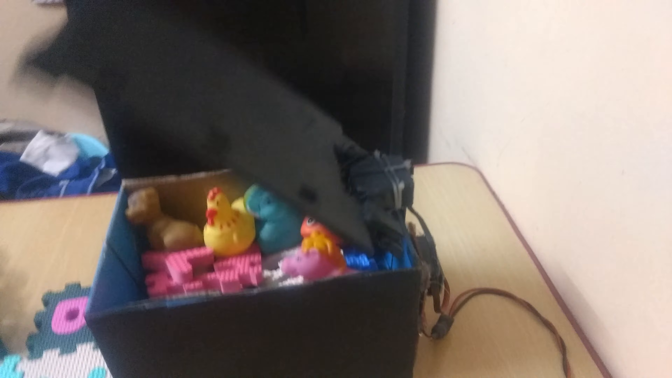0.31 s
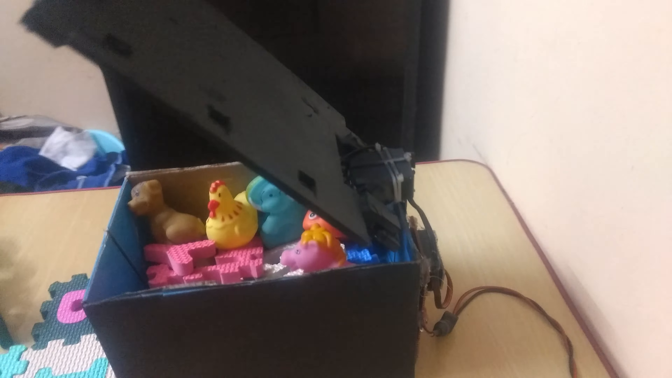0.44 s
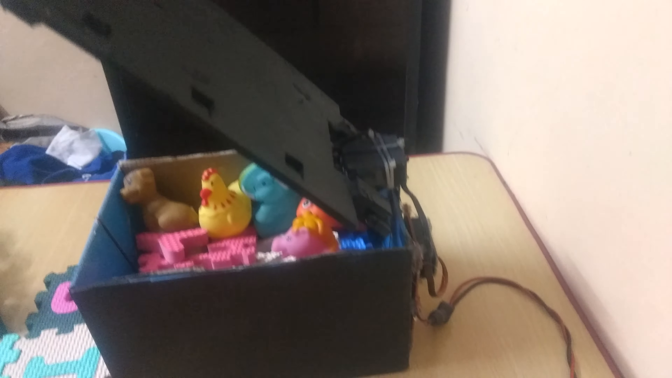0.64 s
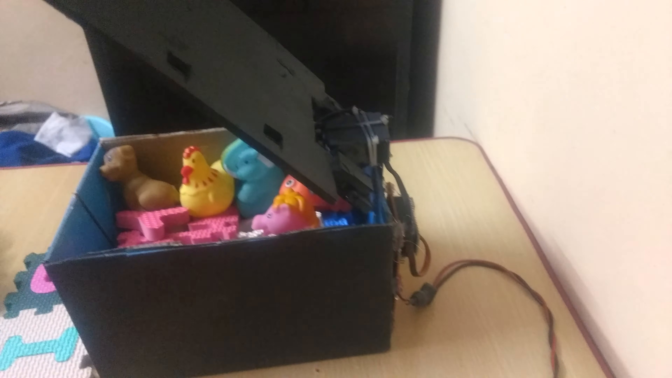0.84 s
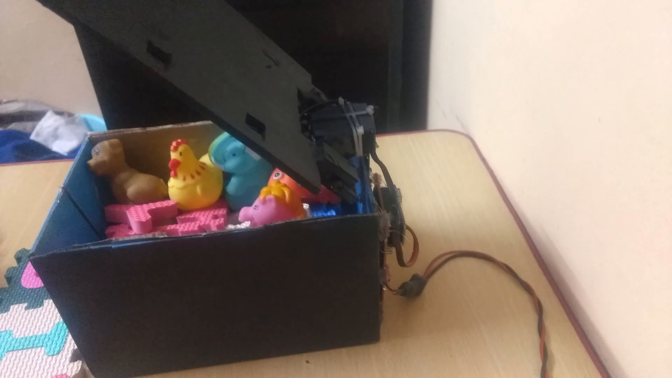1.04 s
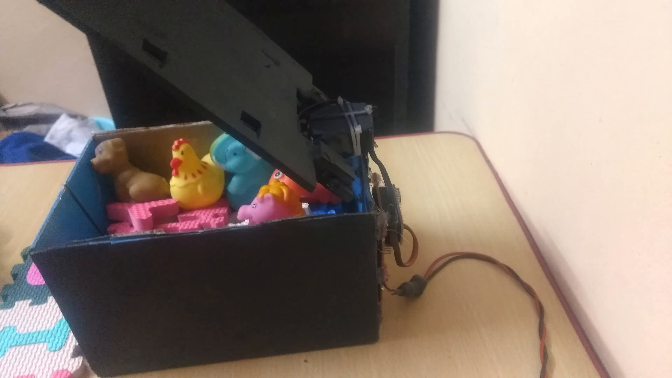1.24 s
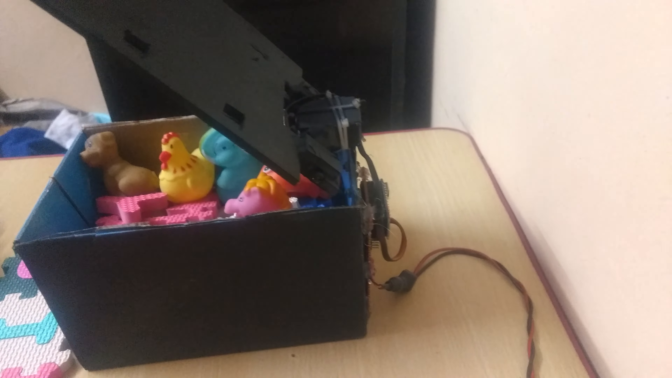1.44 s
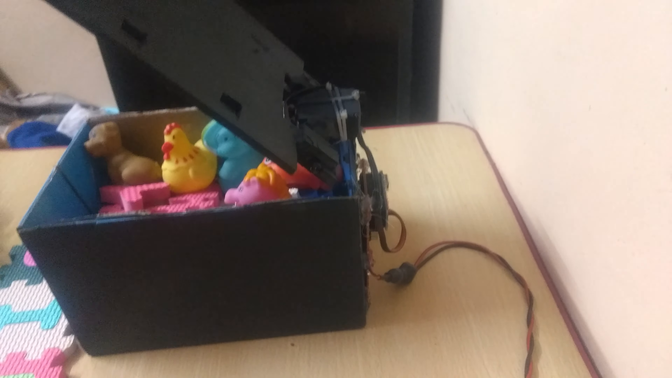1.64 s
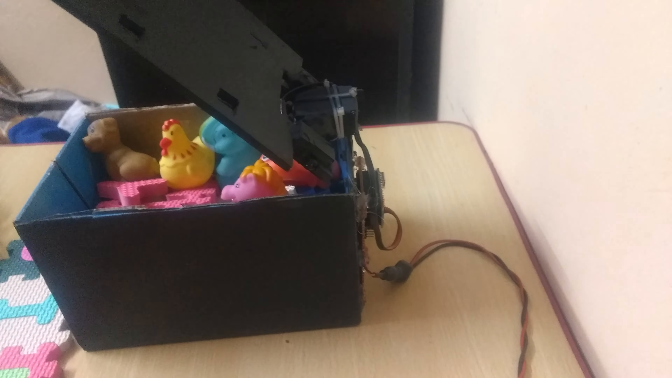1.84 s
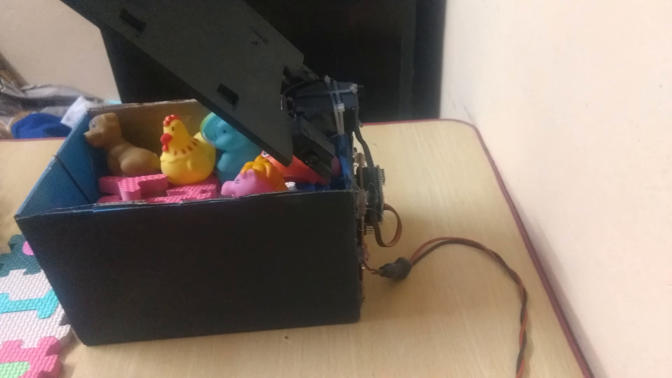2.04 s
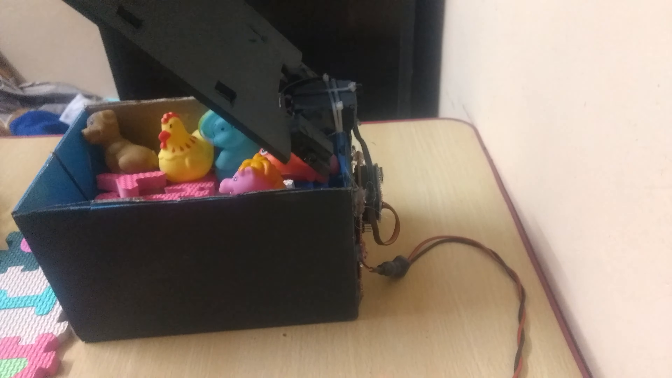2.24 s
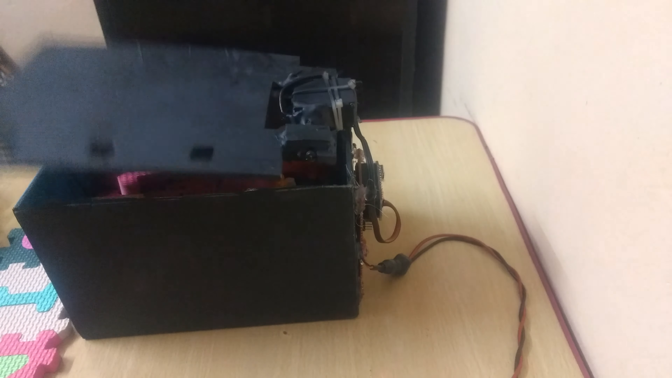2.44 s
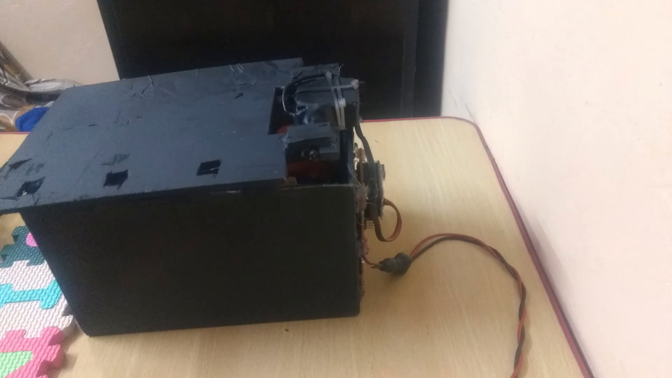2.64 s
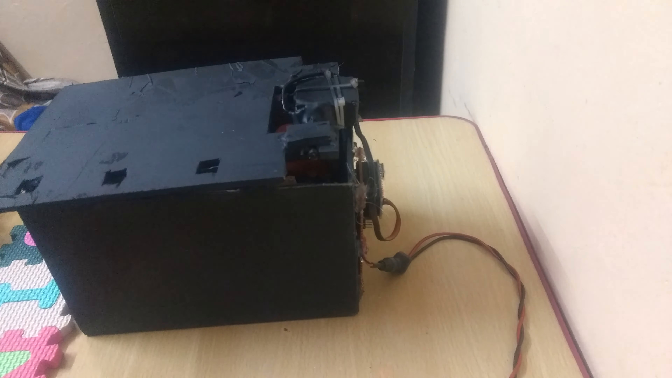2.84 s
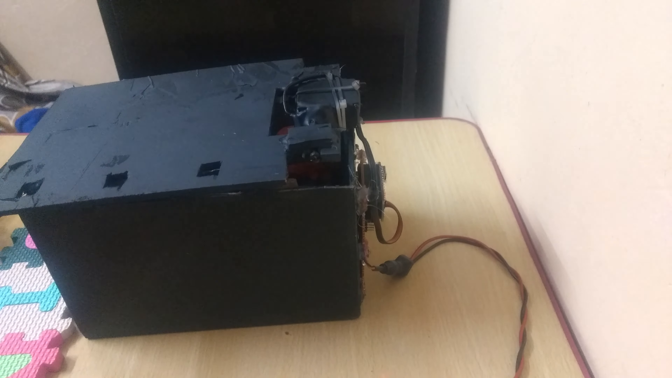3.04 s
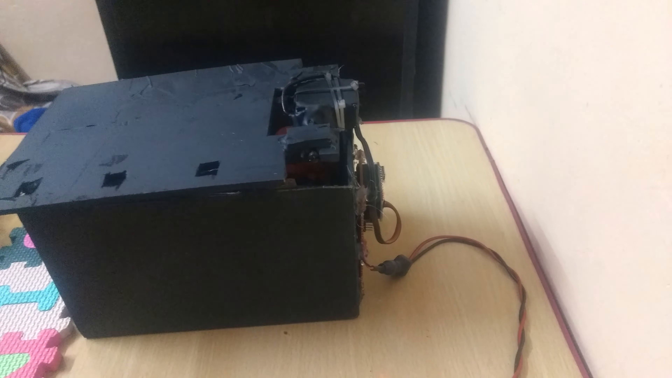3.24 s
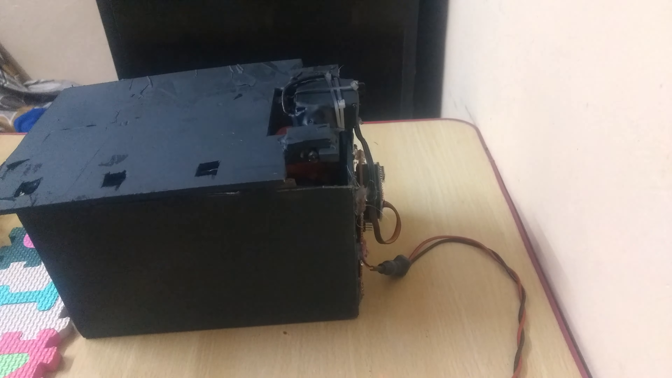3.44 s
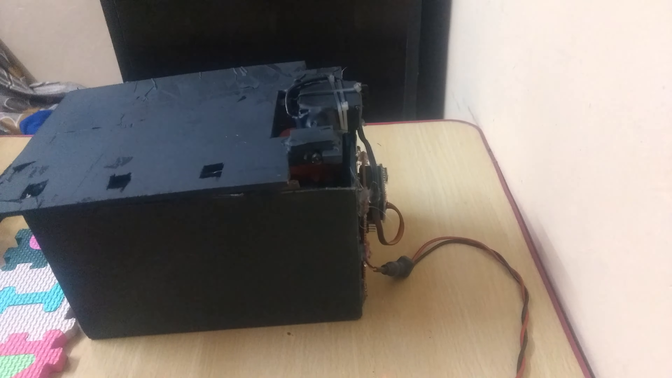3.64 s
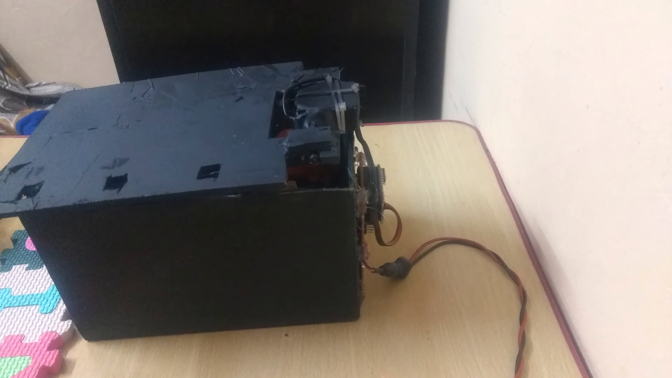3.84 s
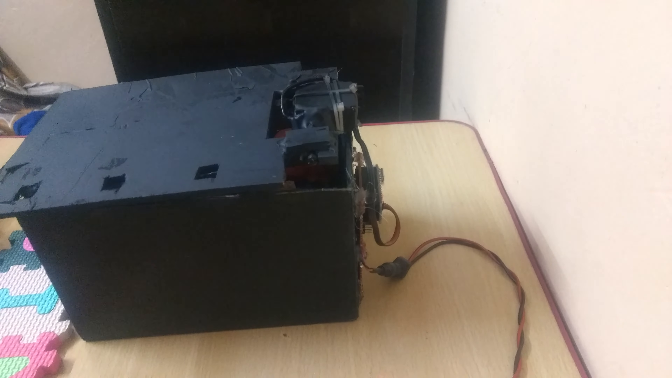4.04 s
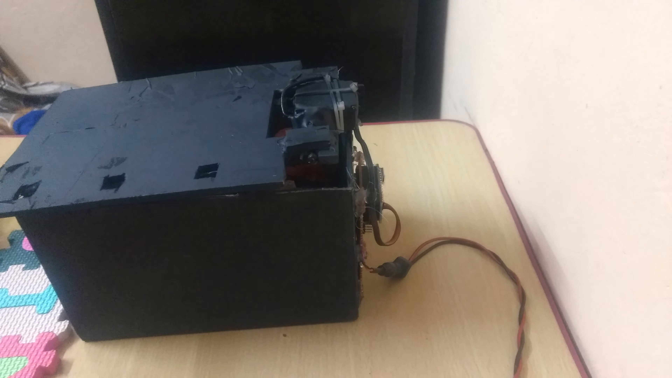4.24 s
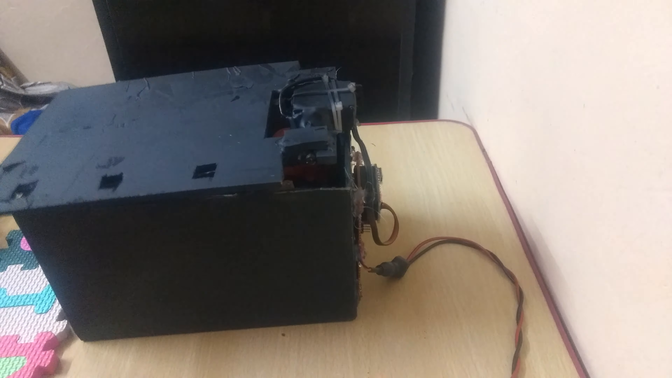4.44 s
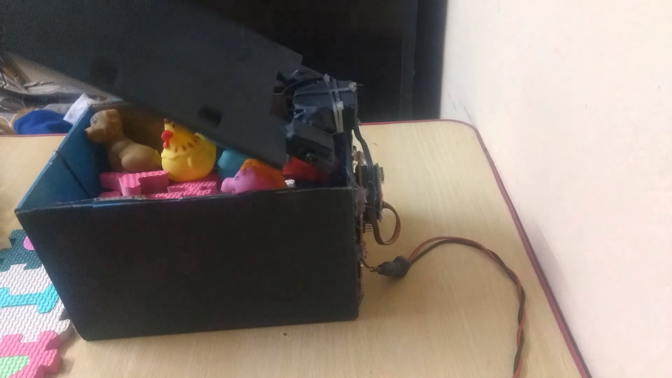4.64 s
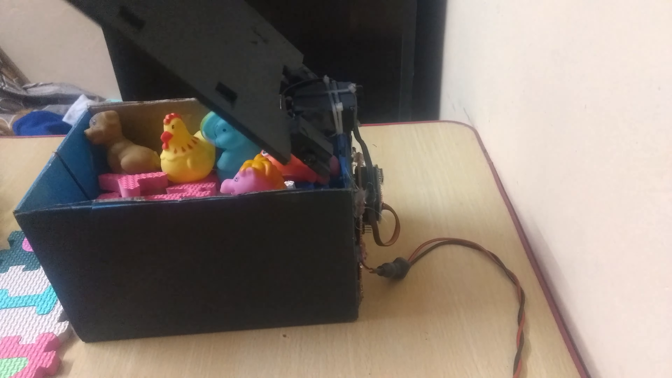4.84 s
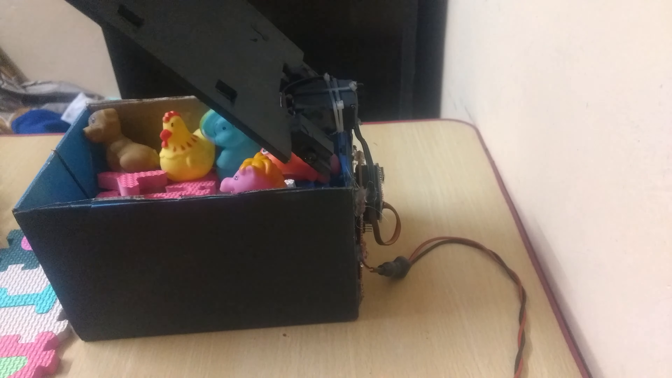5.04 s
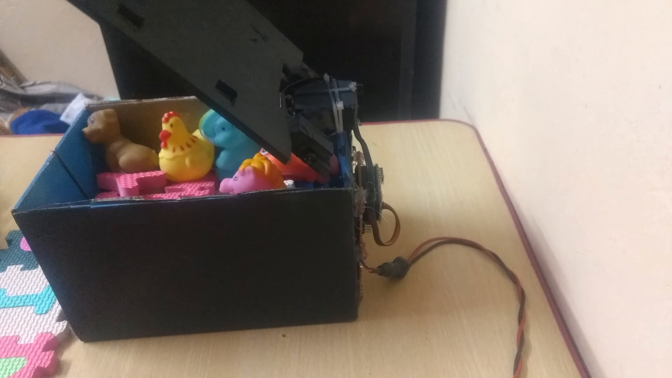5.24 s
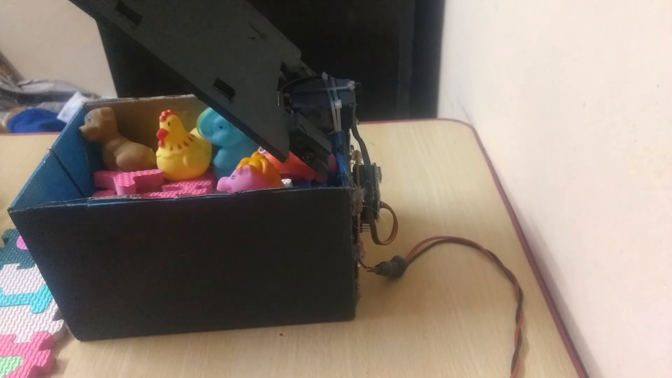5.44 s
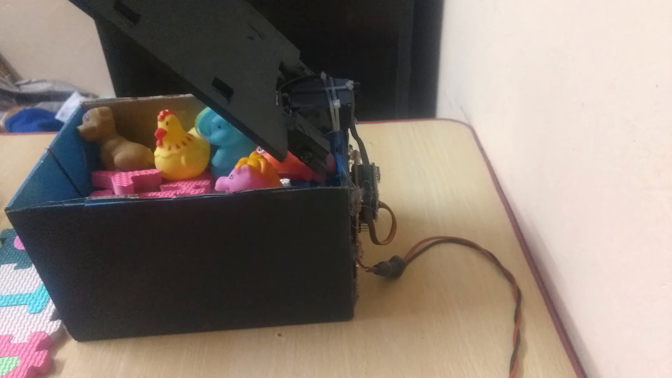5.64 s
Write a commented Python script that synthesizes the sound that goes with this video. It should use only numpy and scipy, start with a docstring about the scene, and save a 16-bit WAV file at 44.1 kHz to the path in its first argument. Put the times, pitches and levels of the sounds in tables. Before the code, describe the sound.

A fan hums low and rushes steadily in a small room, heard through a stereo microphone close to a toy box. Right at the start a hobby servo lifts the lid: a rising gear whir and rattle, under half a second long, with a soft low boom from the lid. From 0.5 to 1.6 seconds the servo ticks faintly, about six times a second. Soft scuffs come near 0.6 and 1.6 seconds. From 2.3 to 2.7 seconds the lid lowers with a lower, uneven gear rattle, a sharp click near 2.4 and another soft boom. Then only the fan remains. At about 4.5 seconds the servo opens the lid again with a brighter, stronger whine that rises, drums through the box and stops by 4.9. Faint ticking follows until the end, near 5.7 seconds. The fan dips slightly after the first two moves and recovers.

```python
"""Servo working a toy box lid

Small room, hand-held camera, its stereo microphone close to the box. A hobby servo swings the lid open,
shut and open again: the gears whine up to speed and rattle through the box, then tick faintly as they
hold the lid. A few soft scuffs fall between the moves. Behind it all a fan hums and rushes."""
import sys
import numpy as np
from scipy import signal
from scipy.fft import rfft, irfft, next_fast_len
from scipy.io import wavfile
from scipy.ndimage import uniform_filter1d, map_coordinates

SR = 44100
rng = np.random.default_rng(int(sys.argv[2]) if len(sys.argv) > 2 else 0)


def materialize(psi):
    """Save the field psi as 16-bit PCM at rate SR to the path in sys.argv[1].

    A 1-D psi becomes a single channel; in a 2-D psi each row is a channel.
    """
    bounded = np.clip(np.atleast_2d(psi).T, -1, 1)
    quanta = np.round(bounded * 32767).astype(np.int16)
    wavfile.write(sys.argv[1], SR, quanta)


N = 251362
TIME = np.arange(N) / SR
TOP_MESH_HZ = 1900  # tooth rate the motor spins up towards


def servo(sizzle_db=-11):
    """The gear mesh whines at its tooth rate; the impacts rattle the case and drum on the box."""
    # lid raised: start t/s, rattle level/dB, drumming level/dB, whine level/dB
    openings = [(.073, -33, -40.5, -38), (4.473, -32, -35.5, -31)]
    # spectrum of the gear rattle: f/Hz, level/dB
    gear_spectrum = [(100, -33), (400, -66), (900, -7), (1300, 1), (1600, 1), (2200, 4.5), (3200, 0),
                     (4300, -4), (5200, -4), (6200, -10.5), (7600, -6.5), (9200, -18.5), (13000, -14.5),
                     (14400, -9.5), (16000, -13.5)]
    # resonances of the servo case: f/Hz, width/Hz, level/dB
    case_modes = [(1637, 130, 3.5), (2600, 420, -11.5), (3060, 49, -1), (4750, 120, 1), (5650, 140, -21),
                  (6200, 76, 4)]
    # resonances of the box panels: f/Hz, width/Hz, level/dB
    box_modes = [(184.6, 12.6, 1.5), (544.4, 7.7, 9), (678, 76, 4.5), (771, 20, -9), (976, 380, -5)]
    mesh_hz, rattle_gain, box_gain, whine_gain = closing() + sum(opening(*row) for row in openings)
    teeth = np.cumsum(mesh_hz * (1 + .01 * wobble(300))) / SR
    impacts = tooth_impacts(teeth, scatter_db=2, impact_s=.00066, slide=.4)
    rattle = unit(filtered(impacts, lambda f: amp(along(gear_spectrum, f)) * (1 + ringing(case_modes, f))))
    drumming = unit(filtered(impacts, lambda f: ringing(box_modes, f) / (1 + 1j * f / 1300)))
    # faster teeth strike harder and add a bright rasp
    hard = tooth_impacts(teeth, scatter_db=3, impact_s=.00019, slide=.56)
    sizzle = amp(sizzle_db) * mesh_hz / 1500 * band(hard, 5630, 1020)
    box = drumming + slow_gears(teeth, mesh_hz)
    mix = rattle_gain * (rattle + sizzle) + box_gain * box + whine_gain * whine(teeth, mesh_hz)
    return mix / np.sqrt(2)


def opening(start, rattle_db, box_db, whine_db, spin_up_s=.06, blend_s=.0023, chirp_db=-30):
    """The motor spins up, pulls, runs and brakes: mesh rate, then rattle, drumming and whine gains."""
    slack_s, pull_end_s, chirp_end_s = .026, .11, .124
    slow_at_s, slow_s, brake_at_s, brake_db_per_s = .212, .13, .27, 169
    age = np.maximum(TIME - start, 0)
    after = lambda s: (1 + np.tanh((age - s) / (2 * blend_s))) / 2
    slowing = np.exp(-(np.maximum(age - slow_at_s, 0) / slow_s) ** 2)
    speed = (1 - np.exp(-age / spin_up_s)) * slowing
    slack_db = -7.5 * (1 - after(slack_s))  # the gears first run quietly through their play
    brake_db = -brake_db_per_s * np.maximum(age - brake_at_s, 0)
    drive = np.minimum(age / blend_s, 1) * amp(slack_db + brake_db)
    pulling = after(slack_s) - after(pull_end_s)
    surge = np.exp(-((age - .253) / .032) ** 2)  # the slowing gears take the lid's momentum
    rattle = amp(rattle_db + 6.5 * pulling + 3.5 * surge)
    drumming = amp(box_db - .5 * pulling)
    # the whine grows with speed and is the first to go when the motor slows
    running = after(chirp_end_s)
    chirp = (1 - running) * amp(chirp_db) * speed
    singing = chirp + running * amp(whine_db + 4.5 * surge) * speed ** 2
    return np.array([TOP_MESH_HZ * speed, drive * rattle, drive * drumming, drive * singing])


def closing(whine_re_rattle_db=-5.5):
    """The same four controls while the lid's weight drives the gears; at rest they make no sound."""
    # the lid sinks, catches, then drops: t/s, mesh f/Hz, rattle level/dB, drumming level/dB
    descent = [(2.272, 0, -46, -42), (2.279, 349.5, -36.5, -42), (2.307, 780.5, -30.5, -34),
               (2.35, 650.5, -35, -37), (2.394, 560, -40, -49), (2.413, 759.5, -22.5, -33),
               (2.46, 1079.5, -28.5, -35), (2.515, 740, -28.5, -32.5), (2.57, 560.5, -36, -34),
               (2.61, 440, -50, -56), (2.72, 0, -62, -70)]
    mesh_hz, rattle_db, box_db = curves(descent)
    turning = np.clip(mesh_hz / 300, 0, 1) ** 2
    return np.vstack([mesh_hz, turning * amp([rattle_db, box_db, rattle_db + whine_re_rattle_db])])


def tooth_impacts(teeth, scatter_db, impact_s, slide):
    """Each passing tooth strikes a short burst of uneven size, over steady sliding noise."""
    strikes = np.diff(np.floor(teeth + .15 * wobble(900)), prepend=0) > 0
    energy = strikes * amp(scatter_db * rng.standard_normal(N)) ** 2
    power = signal.lfilter([1], [1, -np.exp(-2 / (impact_s * SR))], energy)
    power /= np.abs(uniform_filter1d(power, SR // 40)) + 1e-9
    return unit(np.sqrt(power + slide ** 2) * rng.standard_normal((2, N)))


def whine(teeth, mesh_hz, coast_db=-22, full_pull_hz_per_s=4500, flutter_db=3, pinion_teeth=9):
    """Tones at the tooth rate; their rough overtones grow while the motor pulls the gears up to speed."""
    # overtones under full pull: multiple of the mesh rate, level/dB
    harmonics = [(2, 3), (3, -7), (4, -5), (5, -9)]
    # how well the case radiates a tone: f/Hz, level/dB
    radiation = [(400, -16), (600, -1), (1000, -1), (1250, -2), (1450, -2), (1630, 1.5), (1760, 0),
                 (2100, 0), (2420, 4), (2750, -2), (3150, .5), (3500, -10), (4200, -4), (8000, -5)]
    pull = np.clip(uniform_filter1d(np.gradient(mesh_hz), SR // 40) * SR / full_pull_hz_per_s, 0, 1)
    port_phase = np.array([[0], [np.pi / 2]])  # the tones reach the two microphone ports out of step

    def tone(k):
        chatter = (k - 1) * .27 * wobble(700)  # play between the teeth blurs high overtones most
        level_db = along(radiation, k * mesh_hz) + flutter_db * wobble(90)
        return amp(level_db) * np.sin(2 * np.pi * k * teeth + chatter + port_phase)

    fast = np.minimum(mesh_hz / 1200, 1) ** 2
    overtones = fast * amp(coast_db * (1 - pull)) * sum(amp(db) * tone(k) for k, db in harmonics)
    # the slightly eccentric pinion presses harder once a turn
    press = 1 + .26 * np.sin(2 * np.pi * teeth / pinion_teeth)
    return press * (tone(1) + overtones) * amp([[1.5], [-1.5]])


def slow_gears(teeth, mesh_hz):
    """The later gear stages hum unevenly through the box, heard only near full speed."""
    # stage tones: share of the mesh rate, level/dB
    stages = [(.286, -7), (.37, -5), (.5, -9.5)]
    tones = sum(amp(db + 2.5 * wobble(60)) * np.sin(2 * np.pi * share * teeth + .4 * wobble(120))
                for share, db in stages)
    return (mesh_hz / TOP_MESH_HZ) ** 4 * np.sqrt(2) * tones


def lid(boom_half_s=.039):
    """The lid booms softly each time the servo arm jerks it."""
    # jerks that bend the lid: t/s, level/dB
    jerks = [(.13, -42), (2.35, -47), (2.423, -39), (4.55, -47), (4.71, -46)]
    flex = sum(amp(db) * np.exp(-((TIME - s) / boom_half_s) ** 2) for s, db in jerks)
    return flex * band(rng.standard_normal(N), 178.3, 37)


def ticks(hunt_db=-47, return_db=-53, return_s=.095, t60=.0045):
    """Tiny clicks as the teeth take up their play, each just after a weaker first touch."""
    # the servo hunts to and fro under the raised lid: first tick t/s, period/s, count
    hunting = [(.477, .175, 7), (4.87, .1765, 5)]
    # teeth catching: t/s, level/dB
    catches = [(.086, -40), (.6863, -47), (2.286, -43), (2.3002, -44), (2.3336, -32), (2.3875, -28),
               (2.6773, -59), (2.6918, -48), (4.485, -44)]
    # spectrum of a tick: f/Hz, level/dB
    spectrum = [(1000, 17), (4000, 9), (8000, -1.5), (12000, 4.5), (16000, 7)]
    hunts = [first + k * period for first, period, count in hunting for k in range(count)]
    clicks = list(catches) + [(s, hunt_db) for s in hunts] + [(s + return_s, return_db) for s in hunts]
    age = np.arange(SR // 100) / SR
    out = np.zeros((2, N + SR))
    for (s, db), lead in zip(clicks, rng.uniform(.007, .019, len(clicks))):
        for at, level in [(s, db), (s - lead, db - 11)]:
            burst = amp(level - 3 - 60 * age / t60) * rng.standard_normal((2, len(age)))
            out[:, round(at * SR):][:, :len(age)] += burst
    return filtered(out, lambda f: amp(along(spectrum, f)))


def scuffs():
    """Soft rubs against the box that start at once and fade."""
    # rubs: t/s, level/dB, t60/s, centre f/Hz
    rubs = [(.604, -57, .09, 2900), (.65, -65, .6, 7800), (1.605, -47, .45, 1500), (1.73, -58, .8, 2500)]
    out = np.zeros((2, N))
    for s, db, t60, hz in rubs:
        age = TIME - s
        rub = band(rng.standard_normal((2, N)), hz, 3200)
        out += rub * (age > 0) * amp(db - 60 * np.abs(age) / t60 + .51 * wobble(110))
    return out


def fan(drone_hz=174, throb_hz=7, waver_db=2):
    """A throbbing, wandering drone, mains hum and the rush of moved air."""
    # background level, ducked by the camera's gain control after the servo moves, then recovering:
    # t/s, level/dB
    background_level = [(0, -48), (.5, -52.5), (1.2, -47), (2.25, -46.5), (2.7, -52.5), (3.2, -48),
                        (3.7, -46), (4.4, -47), (4.9, -47), (5.7, -45.5)]
    # spectrum of the moving air: f/Hz, level/dB
    spectrum = [(30, -17), (90, -1.5), (170, 4.5), (260, 2.5), (450, -7), (560, -2.5), (780, -0.5),
                (1000, -11), (1600, -13.5), (2300, -20), (3200, -25), (5800, -40), (7200, -35.5),
                (9000, -52.5), (15500, -41.5)]
    # standing waves in the room: f/Hz, width/Hz, level/dB
    room_modes = [(314, 33, -3), (541.5, 10.7, 1.5), (679, 10, -3.5), (950, 7.1, -19), (1058, 30, 1.5),
                  (1200, 55, -3)]
    # mains hum: f/Hz, level/dB
    mains_tones = [(50, -73), (100, -65)]
    background_db, = curves(background_level)
    drone_db = background_db - 4 + waver_db * wobble(16)
    throb = 1 + .14 * np.sin(2 * np.pi * throb_hz * TIME)
    drone = unit(throb * np.sin(2 * np.pi * np.cumsum(drone_hz + 9 * wobble(35)) / SR))
    air = rng.standard_normal((2, N))
    rush = unit(filtered(air, lambda f: amp(along(spectrum, f)) * (1 + ringing(room_modes, f))))
    mains = sum(amp(db + 3.8 * wobble(1.94)) * np.sin(2 * np.pi * hz * TIME) for hz, db in mains_tones)
    rush_db = background_db + 4 + .87 * wobble(18)
    return amp(drone_db) * drone + amp(rush_db) * rush + mains


def in_room(x, wet_db):
    """The direct sound plus the small room's short tail, which lasts longest in the midrange."""
    # room decay: f/Hz, t60/s
    decay = [(200, 0.033), (2000, 0.23), (8000, 0.063), (15000, 0.036)]
    hz, t, noise = signal.stft(rng.standard_normal((2, SR // 2)), SR, nperseg=256)
    tail = signal.istft(noise * amp(-60 * t / along(decay, hz)[:, None]), SR, nperseg=256)[1]
    return x + amp(wet_db) * signal.fftconvolve(x, tail / np.linalg.norm(tail[0]), axes=1)[:, :N]


def amp(db):
    """Decibels to gain."""
    return 10 ** (np.asarray(db) / 20)


def unit(x):
    """Scaled to rms 1."""
    return x / np.sqrt(np.mean(x ** 2) + 1e-20)


def along(points, hz):
    """Interpolate (f/Hz, value) points on a log frequency axis."""
    f, values = np.transpose(points)
    return np.interp(np.log(hz + 1), np.log(f + 1), values)


def curves(rows):
    """One value per sample for each column after the time."""
    s, *columns = np.transpose(rows)
    return [np.interp(TIME, s, column) for column in columns]


def wobble(rate):
    """A smooth random curve, rate knots a second."""
    coarse = np.arange(0, N, 10)
    knots = rng.standard_normal(int(N * rate / SR) + 4)
    return np.interp(np.arange(N), coarse, map_coordinates(knots, [coarse * rate / SR]))


def filtered(x, response):
    """x through a complex frequency response."""
    size = next_fast_len(N + SR // 2)
    return irfft(rfft(x, size) * response(np.fft.rfftfreq(size, 1 / SR)), size)[..., :N]


def ringing(modes, f):
    """Response of a set of resonances (f/Hz, width/Hz, level/dB)."""
    return sum(amp(db) * 1j * f * width / (hz * hz - f * f + 1j * f * width) for hz, width, db in modes)


def band(x, hz, width_hz):
    """x twice through one resonance, at rms 1."""
    return unit(filtered(x, lambda f: ringing([(hz, width_hz, 0)], f) ** 2))


def scene(hiss_db=-77):
    """Servo and box close up, the fan behind, and the microphone's own hiss."""
    hiss = amp(hiss_db) * rng.standard_normal((2, N))
    return in_room(servo() + scuffs() + ticks(), wet_db=-7) + lid() + fan() + hiss


def record(dry, comb_hz=2210, top_hz=15900):
    """The camera's stereo widening swings the two channels in and out of phase along frequency."""
    # reach of that swing: f/Hz, depth 0-1
    depth = [(30, 0), (100, 0), (170, 0.9), (300, 0.36), (600, 0.86), (3000, 0.95), (15000, 0.71)]
    # balance of the two microphone ports: f/Hz, left minus right level/dB
    balance = [(50, 7), (170, 3), (300, 0), (2000, .5), (8000, -1.5), (12000, -4), (15000, -8)]
    alike = lambda f: -np.clip(along(depth, f), 0, .99) * np.cos(2 * np.pi * np.maximum(f / comb_hz, .5))
    mid = filtered((dry[0] + dry[1]) / 2, lambda f: np.sqrt(1 + alike(f)))
    side = filtered((dry[0] - dry[1]) / 2, lambda f: np.sqrt(1 - alike(f)))
    ports = lambda f: amp(np.outer([.5, -.5], along(balance, f))) * (f < top_hz)
    return filtered(np.array([mid + side, mid - side]), ports)


dry = scene()
out = record(dry)
materialize(out)
```